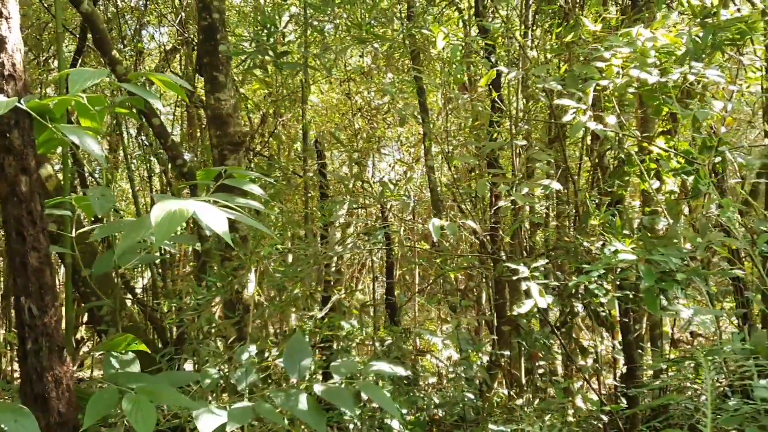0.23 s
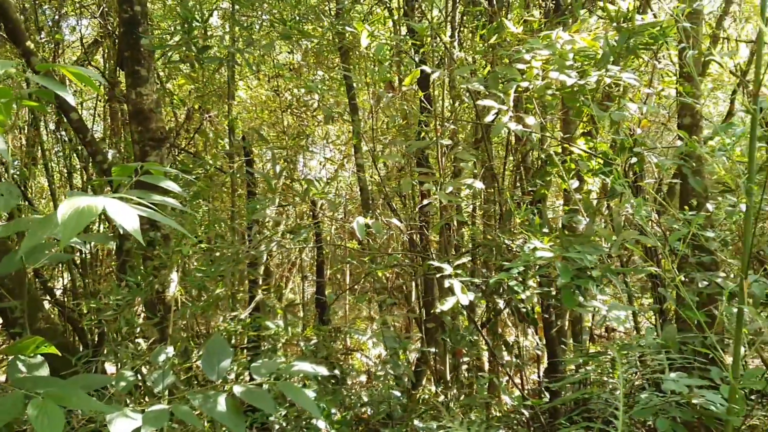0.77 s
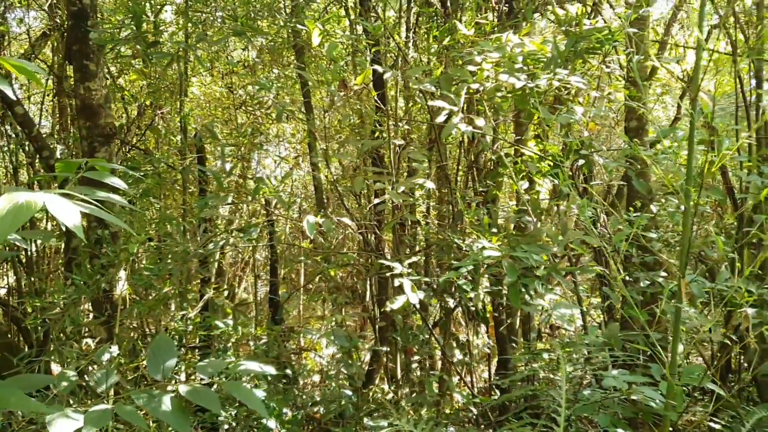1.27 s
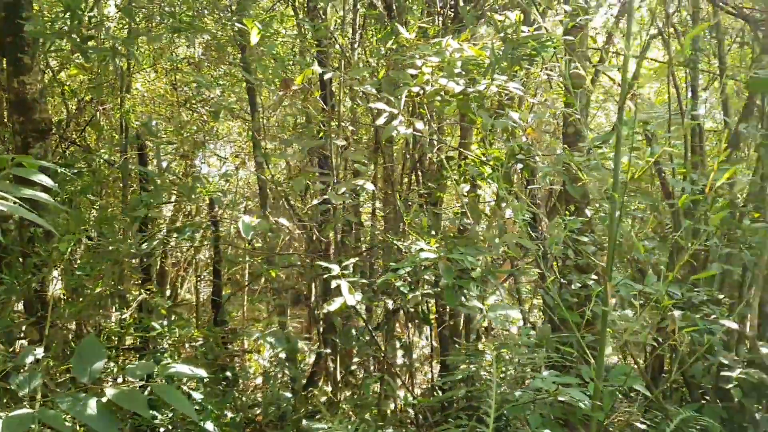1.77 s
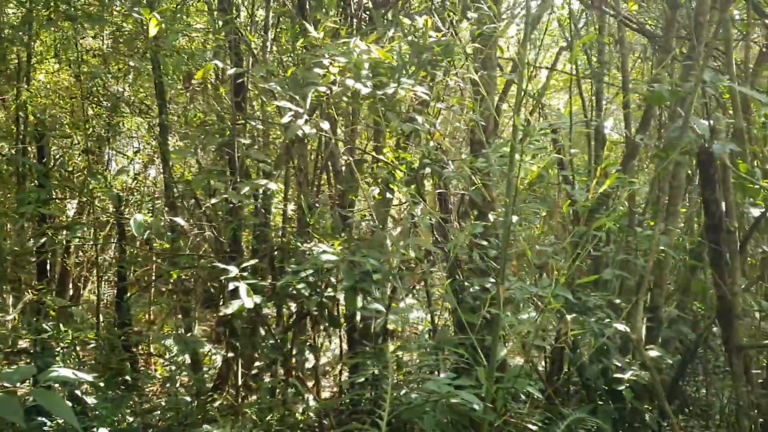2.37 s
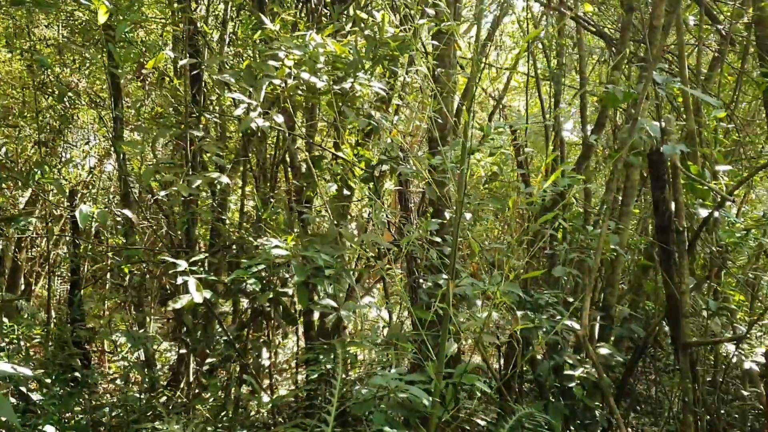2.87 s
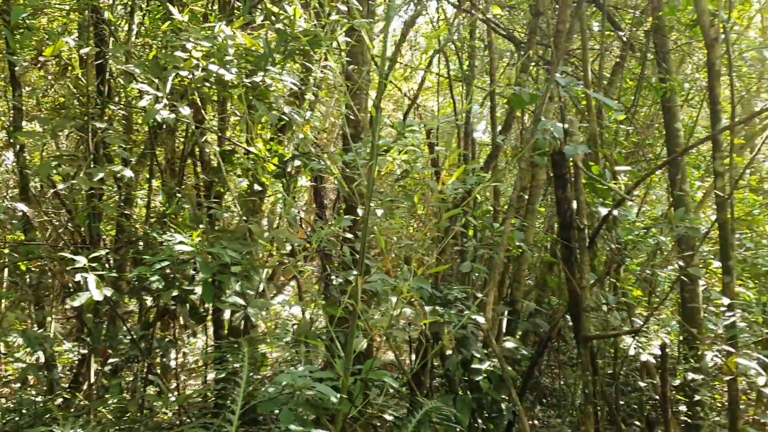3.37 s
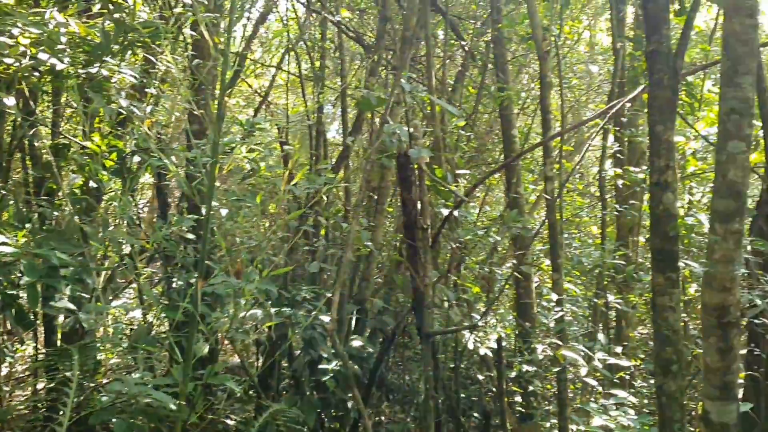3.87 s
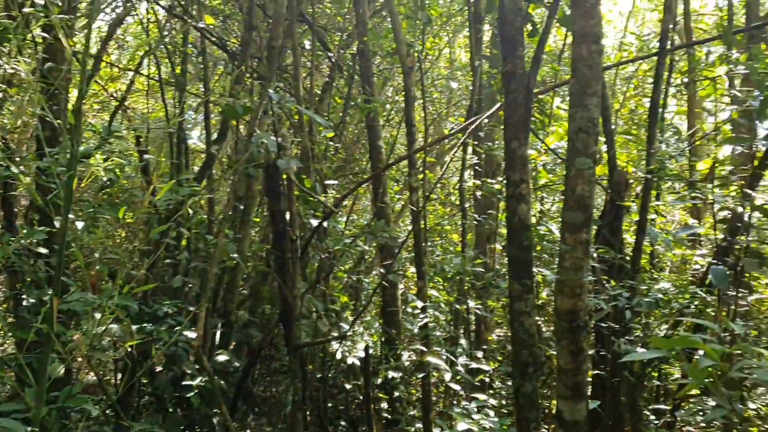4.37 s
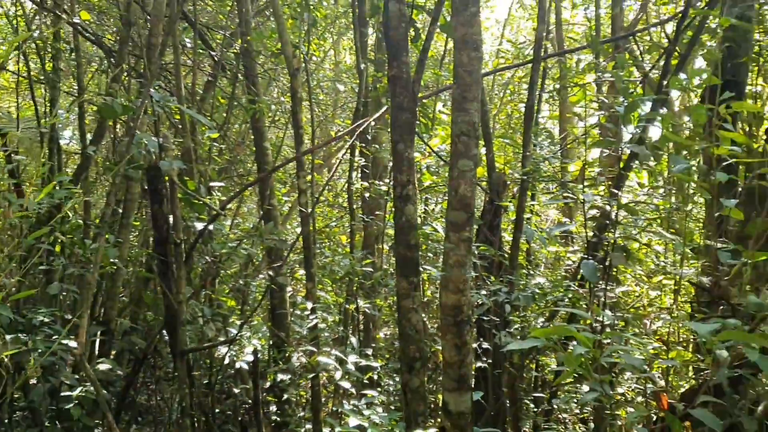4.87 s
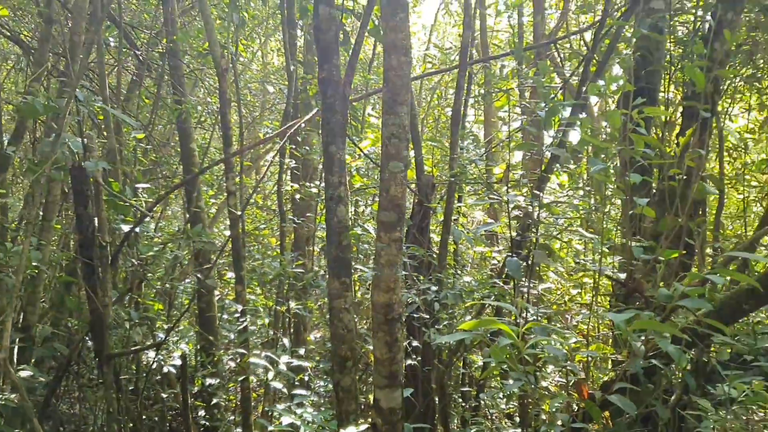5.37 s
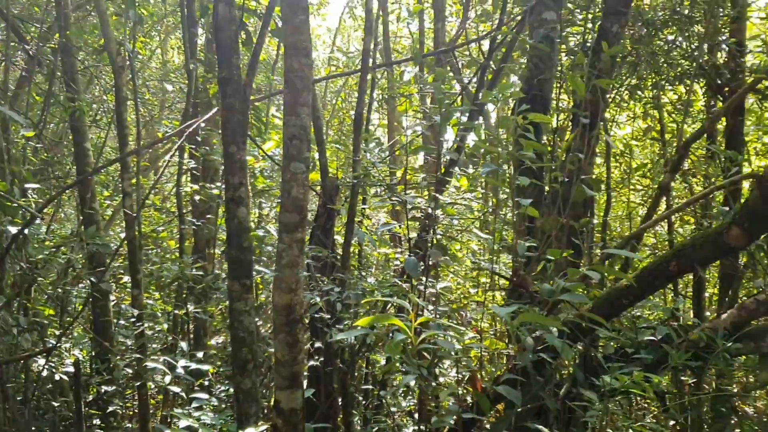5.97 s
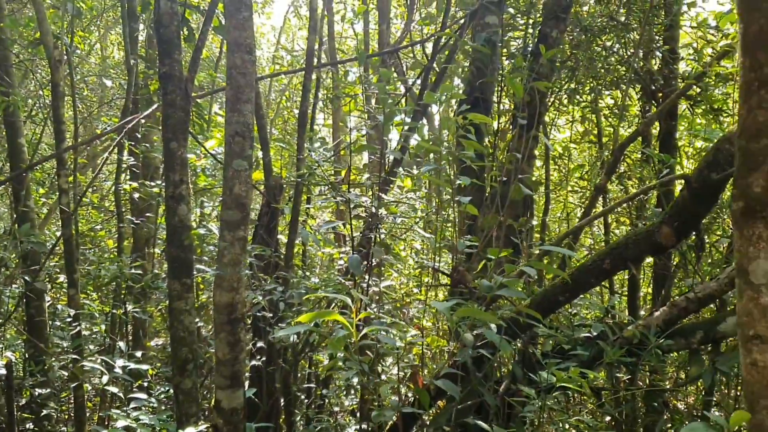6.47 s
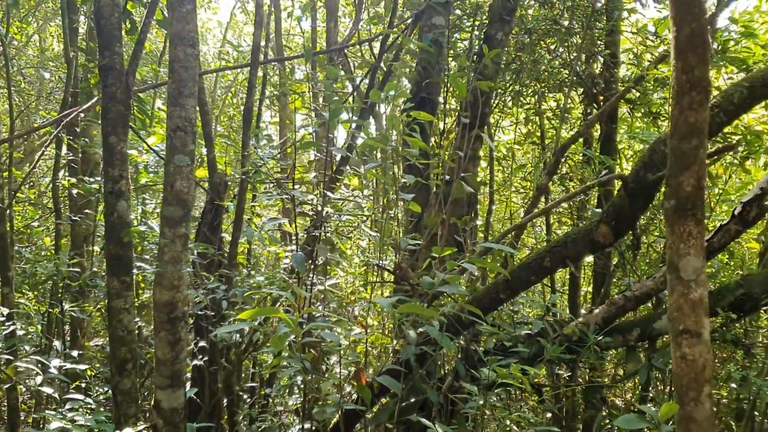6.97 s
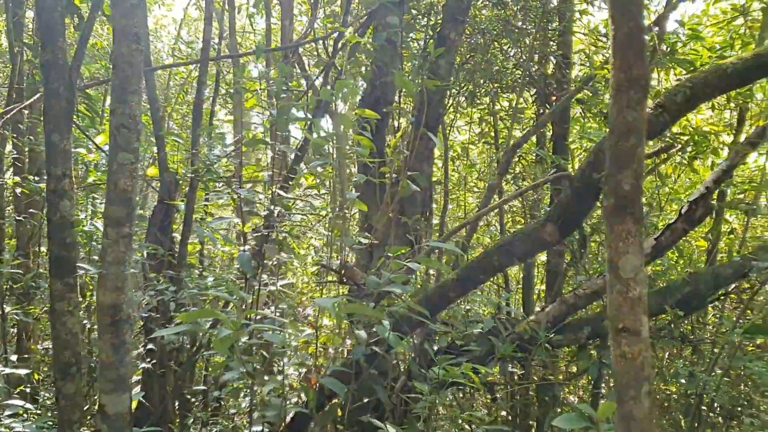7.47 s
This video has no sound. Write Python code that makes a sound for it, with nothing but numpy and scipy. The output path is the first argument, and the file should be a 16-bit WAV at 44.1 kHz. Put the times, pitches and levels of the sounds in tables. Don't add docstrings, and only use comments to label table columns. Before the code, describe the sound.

A hand-held stereo microphone among trees catches a thrush's mellow whistled notes, dipping, holding and trilling with a short woody echo. A wavering cicada band and faint forest hush sit behind. A brief gust stirs the boughs at first, small twigs snap, and a soft dove coo comes near four seconds. Two sharp branch cracks end the song; afterwards only sparse chirps, light rustling and a late crunch remain.

```python
import sys
import numpy as np
from scipy import signal
from scipy.fft import rfft, irfft, next_fast_len
from scipy.io import wavfile
from scipy.ndimage import uniform_filter1d, map_coordinates

SR = 44100
rng = np.random.default_rng(int(sys.argv[2]) if len(sys.argv) > 2 else 0)


def gain_from_db(level_db):
    decades = np.asarray(level_db, float) / 20
    return 10 ** decades


def transcribe(u):
    v = np.clip(np.atleast_2d(u).T, -1, 1)
    q = np.round(v * 32767).astype(np.int16)
    wavfile.write(sys.argv[1], SR, q)


N = 340893
T = np.arange(N) / SR
LEAD = SR // 10

# frequency [Hz], gain [dB].
WINDPIPE = [(1600, -17.5), (1720, -11.5), (1900, -0.5), (2100, -2.5), (2400, 0.4), (2800, -0.5),
            (3100, -3.5), (3400, -6)]


def unit(x):
    return x / np.sqrt(np.mean(x ** 2) + 1e-20)


def along(points, hz):
    f, v = np.transpose(points)
    return np.interp(np.log(hz + 1), np.log(f + 1), v)


def curves(rows, t=T):
    s, *cols = np.transpose(rows)
    return [np.interp(t, s, c) for c in cols]


def wobble(rate_hz):
    return map_coordinates(rng.standard_normal(int(N * rate_hz / SR) + 4), [T * rate_hz])


def filtered(x, response):
    m = next_fast_len(x.shape[-1] + 8192)
    spectrum = rfft(x, m) * response(np.fft.rfftfreq(m, 1 / SR))
    return irfft(spectrum, m)[..., :x.shape[-1]]


def sides(db):
    return gain_from_db(np.array([db / 2, -db / 2]))


def add(track, s, sound):
    part = track[..., round(s * SR):][..., :sound.shape[-1]]
    part += sound[..., :part.shape[-1]]


def swells(rows):
    t = T[::64]
    swell_db = 23
    gains = []
    for s, db, rise_s, fall_s, *_ in rows:
        gain = gain_from_db(db - swell_db * np.maximum((s - t) / rise_s, (t - s) / fall_s))
        gains.append(np.interp(T, t, gain))
    return np.array(gains)


def rush(gain, patchy_db, grainy_db=0):
    # frequency [Hz], left-right correlation.
    alike = [(60, 0.88), (250, 0.69), (1000, 0.19), (3000, -0.16), (5400, 0.68), (9000, -0.21)]
    grains = gain_from_db(grainy_db * unit(uniform_filter1d(rng.standard_normal(N), size=60)))
    z = signal.stft(grains * rng.standard_normal((2, N)), nperseg=512)[2]
    field = uniform_filter1d(rng.standard_normal(z.shape[1:]), size=6, axis=0)
    field = uniform_filter1d(field, size=12, axis=1)
    pair = signal.istft(z * gain_from_db(patchy_db * unit(field)), nperseg=512)[1][:, :N]

    def mid_side(hz):
        turn = np.arccos(np.clip(along(alike, hz), -1, 1)) / 2
        return gain(hz) * np.array([np.cos(turn), np.sin(turn)])

    mid, side = filtered(pair, mid_side)
    return unit(np.array([mid + side, mid - side]))


def echoes(x, stretch, early_db):
    # frequency [Hz], t60 [s].
    wood = [(300, 0.33), (2200, 0.51), (5000, 0.7), (12000, 0.6)]
    hz, t, z = signal.stft(rng.standard_normal((2, SR)), SR, nperseg=256)
    t60 = stretch * along(wood, hz)[:, None]
    decay = gain_from_db(-60 * t / t60) + gain_from_db(-14 - 60 * t / (1.2 * t60))
    tail = signal.istft(z * decay, SR, nperseg=256)[1]
    tail = np.pad(tail / np.linalg.norm(tail[0]), ((0, 0), (200, 0)))
    for port in tail:
        port[rng.integers(150, 1300, size=8)] += gain_from_db(early_db) * rng.standard_normal(8)
    return signal.fftconvolve(x, tail, axes=1)[:, :x.shape[-1]]


def whistle(hz, db, edge_s):
    t = np.arange(len(hz)) / SR
    size = np.sqrt(2) * gain_from_db(db) * np.clip(np.minimum(t, t[-1] - t) / edge_s, 0, 1)
    return size, 2 * np.pi * np.cumsum(hz) / SR


def slur(effort_db, attack_s, release_s, path):
    t = np.arange(path[0][0], path[-1][0], 1 / SR)
    hz, = curves(path, t)
    edges = np.clip(1 - (t - t[0]) / attack_s, 0, 1) + np.clip(1 - (t[-1] - t) / release_s, 0, 1)
    edge_db = 16.5
    return t, hz, effort_db + along(WINDPIPE, hz) - edge_db * edges, 0 * t


def trill(note):
    t = np.arange(note[0][0], note[-1][0], 1 / SR)
    return t, *curves(note, t)


def thrush():
    # (time [s], pitch [Hz]).
    dips = [
        (-34.5, 0.022, 0.015, [(.305, 2810), (.321, 2277), (.35, 2128), (.42, 2013), (.455, 1767), (.51, 1705), (.58, 1936), (.635, 2250), (.655, 2410)]),
        (-34, 0.05, 0.027, [(1.075, 3053), (1.123, 2418), (1.165, 2170), (1.19, 2080), (1.235, 2337), (1.26, 2350)]),
        (-35.5, 0.034, 0.058, [(2.797, 2900), (2.806, 2250), (2.815, 1880), (2.835, 1682), (2.865, 1603), (2.914, 1951), (2.95, 2026), (3.0, 2025), (3.06, 1902)]),
        (-35, 0.031, 0.017, [(3.53, 3540), (3.548, 2487), (3.575, 2370), (3.62, 2296), (3.688, 2020), (3.74, 1971), (3.846, 2180), (3.89, 2544), (3.91, 2552)]),
        (-35.5, 0.05, 0.029, [(4.31, 3090), (4.368, 2570), (4.42, 2243), (4.45, 2452), (4.47, 2502), (4.515, 2565)]),
    ]
    # ([s], [Hz]).
    held = [
        (-36, 0.026, 0.06, [(.82, 3390), (.845, 2960), (.875, 2780), (1.0, 2799)]),
        (-39.5, 0.055, 0.0054, [(1.465, 1580), (1.49, 1738), (1.535, 1770), (1.572, 1913)]),
        (-40, 0.0044, 0.048, [(1.566, 2217), (1.677, 2273), (1.77, 2398), (1.79, 2594)]),
        (-37, 0.075, 0.05, [(1.985, 1667), (2.005, 2003), (2.04, 1946), (2.08, 1759), (2.15, 1704), (2.3, 1749)]),
        (-36.5, 0.045, 0.0092, [(2.398, 2262), (2.415, 2040), (2.458, 2035), (2.51, 1904)]),
        (-33, 0.097, 0.092, [(4.08, 3404), (4.1, 3342), (4.125, 3062), (4.17, 3095), (4.25, 3179)]),
    ]
    # time [s], centre pitch [Hz], level [dB], pitch swing [Hz].
    trills = [
        [(-.087, 2127, -32, 139), (0, 2130, -34, 140), (.07, 2107, -36, 133), (.135, 2053, -39, 134),
         (.15, 2020, -87.5, 140)],
        [(2.505, 2610, -48.5, 60.4), (2.53, 2242, -38, 88.5), (2.56, 2118, -42, 88), (2.62, 2184, -51.5, 90)],
        [(3.13, 3232, -61.5, 82), (3.19, 2633, -40, 151), (3.26, 2561, -35.5, 150), (3.33, 2577, -36, 150),
         (3.37, 2493, -50.5, 141)],
    ]
    # frequency [Hz], strength [dB].
    overtone_db = [(3000, -45.5), (4100, -39.5), (4700, -45.5), (6500, -51.5), (7500, -62.5), (8000, -43.5),
                   (8800, -44.5), (9300, -57.5), (9700, -68.5), (11300, -66.5), (12000, -47.5),
                   (12900, -46.5), (13500, -68), (15300, -57)]
    order_db = {2: -3, 3: 1, 5: -12, 7: 1, 9: 3}
    # time [s], left-right difference [dB].
    bearing = [(0, -2.5), (.7, -3.5), (1.5, -3), (2.1, -5.5), (2.6, -4.5), (3.5, -4), (4.6, -5)]
    trill_hz, dwell = 46.35, 0.27

    song = np.zeros(LEAD + N)
    hoarse = np.pad(0.9 + 1.5 * wobble(260), (LEAD, 0), mode="reflect")
    for t, hz, db, swing_hz in [slur(*note) for note in dips + held] + [trill(note) for note in trills]:
        turn = 2 * np.pi * trill_hz * (t - t[0])
        beat_hz = swing_hz * (np.cos(turn) - dwell * np.cos(2 * turn))
        hz = uniform_filter1d(hz, size=700, mode="nearest") - beat_hz
        size, phase = whistle(hz, db + 0.015 * beat_hz, edge_s=0.003)
        overtones = 0
        for k in range(2, 10):
            strength = gain_from_db(along(overtone_db, k * hz) + order_db.get(k, 0))
            overtones = overtones + (k * hz < 15450) * strength * np.sin(k * phase)
        spared = gain_from_db(-along(WINDPIPE, hz).clip(-7, 0) * (hz < 2000))
        rough = hoarse[LEAD + round(t[0] * SR):][:len(t)]
        add(song, t[0] + LEAD / SR, size * (np.sin(phase) + spared * rough * overtones))
    pan_db = np.pad(curves(bearing)[0], (LEAD, 0), mode="edge")
    return sides(pan_db) * np.array([np.roll(song, 3), song])


def twigs():
    # time [s], peak [dB], splinter t60 [s], body [dB].
    dry_twigs = [(0.2204, -55.5, 0.0091, -1.5), (0.2484, -83, 0.016, -8), (0.9025, -50.5, 0.017, 12),
                 (1.817, -51.5, 0.011, 20.5), (2.6448, -54, 0.019, 0), (2.668, -57.5, 0.04, -5),
                 (2.678, -57, .02, -6), (2.717, -57.5, 0.017, 2), (2.7393, -37.5, 0.02, -2),
                 (2.7793, -47.5, 0.04, 3), (2.9097, -46, 0.032, 9), (3.5465, -49.5, 0.012, 12),
                 (4.3537, -45.5, 0.012, -21.5), (4.766, -60, 0.013, 7), (4.8068, -59, 0.014, -3),
                 (6.0326, -53, 0.02, 5.5), (6.054, -57, 0.013, -1), (6.0749, -59, 0.016, -1),
                 (7.03, -62, .015, -1), (7.215, -63, .015, 0), (7.648, -61, .015, -3)]
    # time [s], peak [dB], splinter t60 [s], body [dB].
    branch = [
        (4.4394, -9.5, 0.017, 0),
        (4.5089, -33, .01, -8),
        (4.519, -35, .01, -8.5),
        (4.5302, -11.5, 0.014, 3.5),
        (4.5331, -19.5, .02, -1),
        (4.5361, -17, 0.03, 1.5),
        (4.545, -34, 0.024, 2),
    ]
    # frequency [Hz], density [dB per Hz].
    snap = [(60, -38), (150, -18), (300, -27), (550, -14.5), (850, -21), (1250, -11.5), (2200, 2.5),
            (3200, -4.5), (4300, 1.5), (5800, -10), (8200, -19), (11000, -13.5), (14500, -19.5),
            (16300, -38)]
    # frequency [Hz], density [dB per Hz].
    split = [(45, -38), (100, -12.5), (890, -20.5), (1500, -7.5), (2080, -1.5), (3200, -2), (4400, -2),
             (6000, -14), (14500, -26.5), (16300, -45.5)]
    # frequency [Hz], left-right difference [dB].
    shadow = [(500, -0.5), (1500, -4.5), (4000, -8.5), (8000, 8), (14000, 6)]
    split_from_s, rise_s, margin = 4.5, 0.00044, 40

    out, t = np.zeros((2, N)), np.arange(SR // 20) / SR
    for s, db, t60, body_db in dry_twigs + branch:
        noise = rng.standard_normal((3, len(t)))
        shared = np.array([np.roll(noise[0], 5), noise[0]])
        burst = (shared + noise[1:]) * gain_from_db(-60 * t / t60) * np.clip(t / rise_s, 0, 1)
        burst[[0, 1], [49, 44]] += 10
        burst += filtered(burst.mean(0) - burst, lambda f: f < 1000)

        def colour(f):
            wood_db = along(split if s > split_from_s else snap, f)
            body = along([(2500, body_db), (7000, 0.01)], f)
            return gain_from_db(wood_db + body) * sides(along(shadow, f))

        crack = filtered(np.pad(burst, ((0, 0), (margin, 0))), colour)
        add(out, s - margin / SR, gain_from_db(db + 15) * crack / np.abs(crack).max())
    return out


def litter():
    # time [s], peak [dB], rise [s], fall [s], weight [dB].
    footfalls = [(1.42, -84, 0.11, 1, 4), (2.25, -83, 0.17, 0.063, 6), (2.87, -66.5, 0.46, 0.27, -3.5),
                 (3.63, -76, 0.11, 0.17, -22), (3.81, -56.5, 0.38, 0.31, -24),
                 (4.351, -66.5, 0.15, 0.45, -14), (4.53, -61, 0.25, 0.19, 5), (4.85, -90, .3, 0.97, 5.5),
                 (5.68, -77, 0.36, 0.11, -3), (6.24, -100.5, 0.65, 0.253, 8.5),
                 (7.0, -71, 0.22, 0.36, -3.5), (7.076, -65.5, 0.09, 0.06, 10), (7.35, -83, 0.18, 0.8, 5.5),
                 (7.6, -65.5, 0.045, 0.073, 0)]
    # time [s], peak [dB], rise [s], fall [s].
    sprigs = [
        (.1, -89.5, 0.33, 0.24),
        (.6, -79, 0.25, 0.26),
        (1.28, -84.5, 0.41, 0.079),
        (2.85, -84, .4, 0.17),
        (4.55, -73.5, 0.25, 0.15),
        (5.1, -89.5, .2, 0.29),
        (7.075, -77, 0.09, 0.14),
        (7.6, -100, 0.053, .08),
    ]
    # time [s], level [dB].
    gust = [(0.0, -58.5), (0.3, -65.5), (0.6, -64.5), (0.76, -68), (.98, -60), (1.08, -66), (1.2, -57.5),
            (1.35, -73.5), (1.7, -120)]
    # frequency [Hz], density [dB per Hz].
    rustle = [(240, -44), (400, -30.5), (798, -13.5), (1590, -2.5), (2180, 7.5), (4230, 1), (5410, 0.5),
              (9000, -25.5), (11700, -61), (19800, -120)]
    # frequency [Hz], density [dB per Hz].
    crackling = [(3530, -33.5), (6000, -2), (7580, -12.5), (8260, -5), (15300, -13.5), (15600, -60.5)]
    # frequency [Hz], density [dB per Hz].
    crunching = [(150, -24.5), (300, -18.5), (700, -1.5), (1300, -8), (2200, -5), (3500, -39)]
    # frequency [Hz], density [dB per Hz].
    sough = [(500, -36.5), (750, -13), (1050, -31), (1500, -9), (1900, -10), (2550, -3), (3000, 5.5),
             (3350, -3.5), (3700, -1), (4100, -10), (4500, -7.5), (7000, -22), (9000, -49.5)]

    def layer(gain, spectrum, grainy_db):
        return gain * rush(lambda f: gain_from_db(along(spectrum, f)), 3, grainy_db)

    steps = swells(footfalls)
    weight = gain_from_db(np.array(footfalls)[:, -1])
    stir = steps.sum(0) + gain_from_db(-91.5)
    crunch = weight @ steps + gain_from_db(-84)
    crackle = gain_from_db(-13) * steps.sum(0) + gain_from_db(-91.5) + swells(sprigs).sum(0)
    leaves = layer(gain_from_db(8.5) * stir, rustle, grainy_db=1.5)
    leaves += layer(gain_from_db(2.5) * crunch, crunching, grainy_db=-2.5)
    leaves += layer(gain_from_db(8) * crackle, crackling, grainy_db=1)
    return leaves + layer(gain_from_db(curves(gust)[0] + 12), sough, grainy_db=0.5)


def thumps():
    # time [s], level [dB], frequency [Hz].
    knocks = [
        (0.248, -47, 111),
        (2.903, -53, 283),
        (3.467, -54, 60.3),
        (4.445, -30.5, 150.2),
        (4.534, -29.5, 198.1),
        (4.4405, -43, 587),
        (4.531, -36.5, 530),
        (7.075, -56, 637),
        (7.075, -51, 2150),
    ]
    cycles, rise_s = 9, 0.0006
    out, t = np.zeros(N), np.arange(SR // 4) / SR
    for s, db, hz in knocks:
        size = gain_from_db(db - 1 - 60 * t / max(cycles / hz, 0.04)) * (1 - np.exp(-t / rise_s))
        add(out, s, size * np.sin(2 * np.pi * hz * t))
    return out


def calls(rows, flutter_hz, fade_db=0):
    flock, shake = np.zeros((2, N)), wobble(120)
    pans_db = rng.normal(0, 3.5, len(rows))
    for (s, length_s, start, middle, end, db), pan_db in zip(rows, pans_db):
        u = np.linspace(-1, 1, round(length_s * SR))
        hz = middle + (end - start) / 2 * u + ((start + end) / 2 - middle) * u * u
        hz = hz + flutter_hz * shake[round(s * SR):][:len(u)]
        size, phase = whistle(hz, db - fade_db * u, length_s * 0.18)
        add(flock, s, sides(pan_db)[:, None] * size * np.sin(phase))
    return flock


def chucks():
    # start [s], length [s], top [Hz], end [Hz], level [dB].
    near = [
        (2.226, 0.058, 1575, 1360, -54),
        (5.514, 0.073, 1621, 1070, -54),
    ]
    # start [s], length [s], start, middle, end [Hz], level [dB].
    clear = [
        (5.59, 0.072, 1320, 1505, 1580, -64),
        (5.66, 0.19, 1580, 1840, 2180, -73.5),
        (6.82, 0.087, 1210, 1290, 1220, -70.5),
        (6.9, 0.11, 1240, 1050, 815, -75.5),
    ]
    hooks = [(s, length_s, 0.74 * top, top, end, db) for s, length_s, top, end, db in near]
    return calls(hooks, flutter_hz=14) + calls(clear, flutter_hz=40)


def far_birds():
    # start [s], length [s], middle pitch [Hz], level [dB].
    steep = [
        (1.433, 0.043, 3670, -57),
        (2.042, 0.13, 4040, -62),
        (2.291, 0.13, 3720, -67),
        (5.61, 0.03, 4140, -54.5),
        (5.672, 0.039, 3970, -70.5),
        (7.527, 0.04, 4160, -53),
        (7.604, 0.039, 3850, -63.5),
    ]
    # start [s], held pitch [Hz], level [dB].
    run = [
        (5.435, 6500, -66),
        (5.64, 6560, -65.5),
        (5.843, 6520, -65),
        (6.019, 6480, -65.5),
        (6.2, 6410, -67.5),
    ]
    # start [s], length [s], start pitch [Hz], end pitch [Hz], level [dB].
    stray = [(1.629, 0.036, 2540, 3217, -55), (2.76, 0.04, 3068, 3080, -52),
             (1.986, 0.0077, 2320, 2430, -52.5), (3.106, 0.083, 5390, 7100, -57),
             (2.075, 0.21, 3480, 3390, -71.5), (4.851, 0.11, 773, 650, -70.5), (4.974, 0.13, 531, 462, -69),
             (5.157, .22, 2278, 1992, -66), (5.39, 0.049, 2570, 2620, -70), (5.43, 0.05, 2670, 2990, -69.5),
             (5.43, 0.052, 2090, 2130, -74), (5.46, 0.091, 2510, 2455, -65), (5.56, 0.048, 7120, 7260, -64),
             (5.554, 0.036, 2950, 1790, -57), (5.819, 0.17, 2143, 2083, -74),
             (6.229, 0.057, 1785, 1813, -73.5), (6.506, 0.03, 2605, 2423, -61.5),
             (6.529, 0.093, 2447, 2376, -73), (6.555, 0.093, 1955, 1805, -73),
             (0.031, 0.058, 760, 760, -73), (0.169, 0.053, 752, 747, -63), (0.349, 0.052, 750, 746, -65.5),
             (0.562, .04, 760, 743, -66.5), (6.973, 0.057, 977, 790, -70), (7.053, 0.034, 830, 644, -63.5),
             (7.099, 0.13, 657, 652, -70), (7.295, 0.082, 2460, 2294, -71.5),
             (7.318, 0.13, 1888, 2135, -71), (7.44, 0.12, 2156, 2084, -72), (7.528, .03, 5500, 6310, -62),
             (6.848, .1, 2485, 1900, -72), (5.4, .06, 2150, 2090, -75), (7.567, 0.042, 2784, 960, -76.5)]
    rise_s, hold_s, from_hz = 0.012, 0.07, 5500
    sweeps = [(s, length_s, 1.28 * hz, hz, 0.74 * hz, db) for s, length_s, hz, db in steep]
    rises = [(s, rise_s, from_hz, (from_hz + hz) / 2, hz, db + 8) for s, hz, db in run]
    holds = [(s + rise_s, hold_s, hz, hz, hz, db - 4) for s, hz, db in run]
    glides = [(s, length_s, start, (start + end) / 2, end, db) for s, length_s, start, end, db in stray]
    return calls(sweeps, flutter_hz=190, fade_db=4) + calls(rises + holds + glides, flutter_hz=65)


def dove():
    # time [s], pitch [Hz], level [dB].
    coo = [
        (3.901, 434.7, -89),
        (4.1, 435.5, -62),
        (4.3, 437.3, -67.5),
        (4.459, 438, -73.5),
    ]
    t = np.arange(coo[0][0], coo[-1][0], 1 / SR)
    size, phase = whistle(*curves(coo, t), edge_s=0.031)
    return np.pad(size * np.sin(phase), (round(t[0] * SR), N))[:N]


def cicadas():
    # time [s], level [dB].
    chorus = [(0, -60.5), (.7, -63), (1.3, -61), (2.0, -63), (2.6, -61), (3.3, -61.5), (3.9, -62),
              (4.5, -62.5), (5.05, -69), (5.6, -61), (6, -69.5), (6.4, -65), (7, -65.5), (7.73, -65)]
    # centre [Hz], width [Hz].
    tymbals = [
        (5330, 570),
        (6450, 1000),
    ]
    singers_hz = [5130, 5270, 5380, 5430, 5550]
    drift = 0.007 * wobble(4)

    def blur(centre, width):
        band = rush(lambda f: 1 / (1 + ((f - centre) / (width / 2)) ** 4), patchy_db=2.5, grainy_db=2.5)
        return gain_from_db(wobble(6)) * band

    def singer(hz):
        pitch = hz * (1 + drift + 0.008 * wobble(13) + 0.001 * wobble(60))
        line = gain_from_db(6 * wobble(16) + 3 * wobble(60)) * np.sin(2 * np.pi * np.cumsum(pitch) / SR)
        return np.array([line, np.roll(line, 3)])

    lower, upper = [blur(*row) for row in tymbals]
    lines = unit(sum(singer(hz) for hz in singers_hz))
    return gain_from_db(curves(chorus)[0]) * (gain_from_db(-1) * lower + gain_from_db(5) * lines + gain_from_db(-12) * upper)


def air():
    # frequency [Hz], density [dB per Hz].
    hush_db = [(76, -45.5), (130, -14), (183, -9), (489, -9.5), (1030, -29.5), (1840, -20), (4460, -41.5),
               (5340, 7), (5910, -23), (6930, -24.5), (7510, -30.5), (11200, -41), (15300, -47),
               (15600, -90)]
    # time [s], level [dB].
    breeze = [(0, -72), (.7, -76.5), (4.2, -71.5), (5.2, -78), (7, -81.5), (7.73, -77.5)]
    # frequency [Hz], density [dB per Hz].
    rumble_db = [(15, -47.5), (25, -21.5), (40, -7), (62, 1.5), (85, -2.5), (110, -11), (170, -28),
                 (300, -61)]
    # time [s], peak [dB], rise [s], fall [s].
    grip = [
        (.1, -67, .1, 1.6),
        (1.72, -62.5, 0.47, 0.15),
        (2.15, -61, 0.48, 0.75),
        (3.12, -62, 0.23, 0.3),
        (3.44, -59, 0.058, 0.47),
        (4.5, -56.5, 0.59, 0.47),
        (6.07, -75, 0.6, 0.89),
        (7.73, -60.5, 1.1, .1),
    ]
    hush = rush(lambda f: gain_from_db(along(hush_db, f)) * (abs(f - 5800) > 1100), patchy_db=3)
    rumble = rush(lambda f: gain_from_db(along(rumble_db, f)), patchy_db=0)
    hand = (swells(grip).sum(0) + gain_from_db(-75.5)) * gain_from_db(0.5 * wobble(14))
    return gain_from_db(curves(breeze)[0] + 1.5) * hush + sides(-2)[:, None] * hand * rumble


def scene():
    # frequency [Hz], gain [dB].
    leaf_return = [(600, -1.5), (1600, -5), (2500, -7), (4200, -6), (7000, 6), (15300, 5.5), (15600, -49.5)]
    hooks, snaps, far = chucks(), twigs(), far_birds()
    song = thrush() + np.pad(gain_from_db(-3) * hooks, ((0, 0), (LEAD, 0)))
    near = gain_from_db(0.5) * (song + echoes(song, stretch=0.82, early_db=-12))[:, LEAD:]
    distant = gain_from_db(-17) * far + echoes(far, stretch=0.8, early_db=-14)
    bright = filtered(snaps, lambda f: gain_from_db(along(leaf_return, f)))
    snaps = snaps + gain_from_db(-8.5) * echoes(bright, stretch=0.42, early_db=-27)
    birds = near + gain_from_db(-6) * hooks + distant + dove()
    return birds + snaps + thumps() + litter() + cicadas() + air()


def top_cut(x):
    return signal.sosfilt(signal.butter(12, 16510, fs=SR, output="sos"), x)


def record(dry):
    held = dry / (1 + np.abs(dry) ** 10) ** (1 / 10)
    held = filtered(held, lambda f: f < 16450)
    return top_cut(held)


dry = scene()
out = record(dry)
transcribe(out)
```